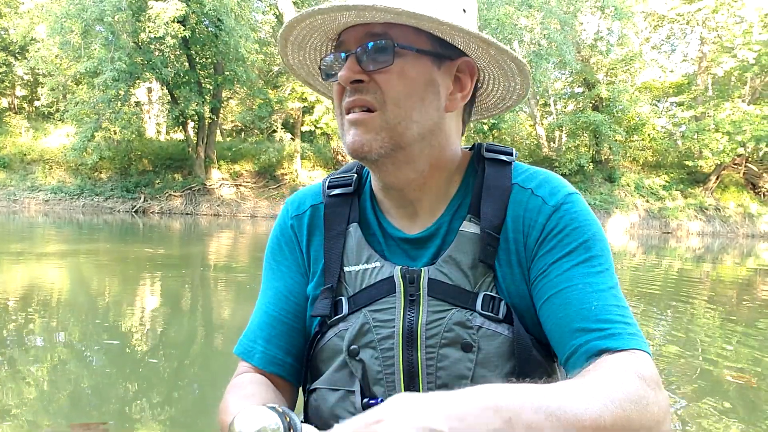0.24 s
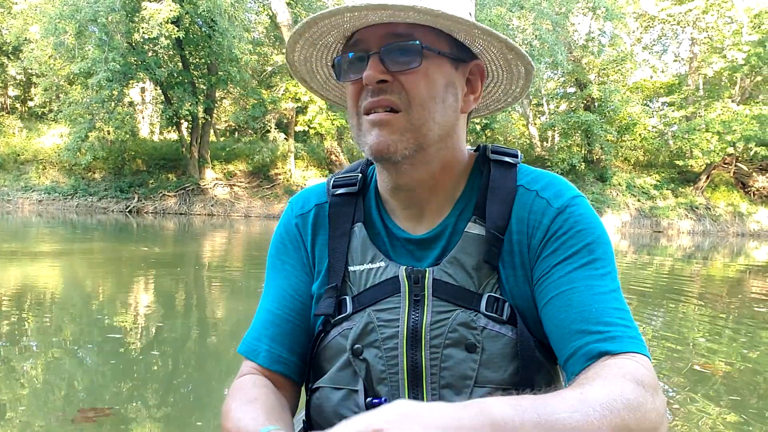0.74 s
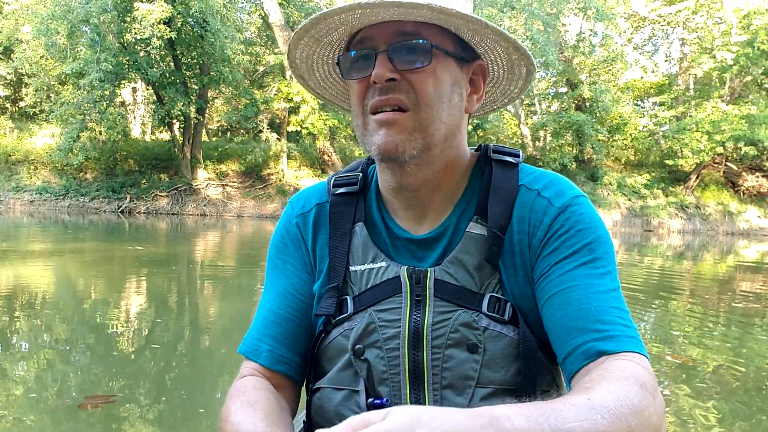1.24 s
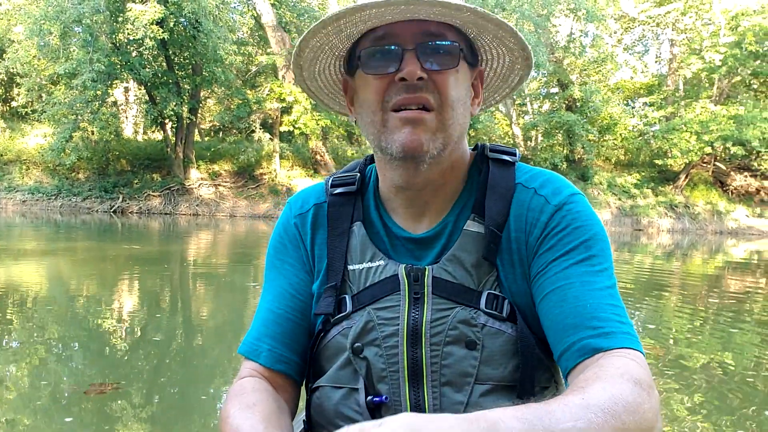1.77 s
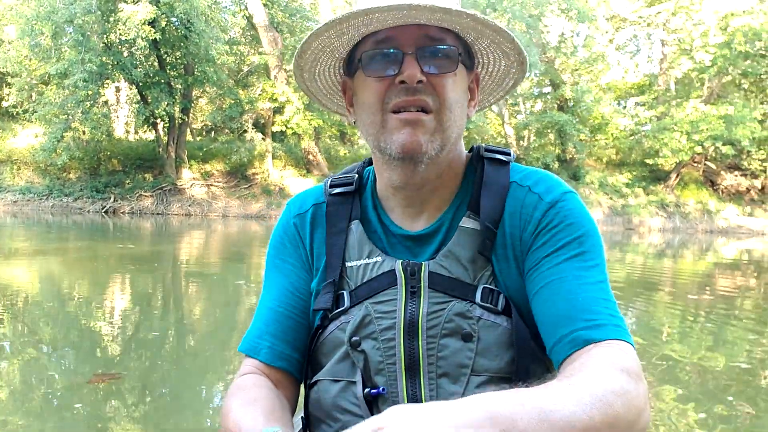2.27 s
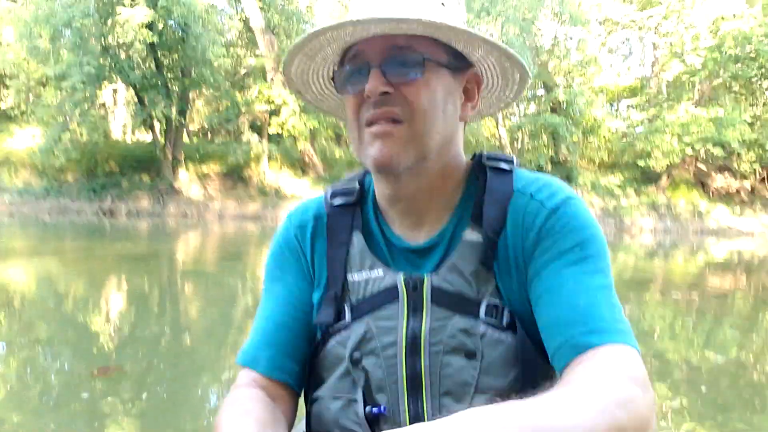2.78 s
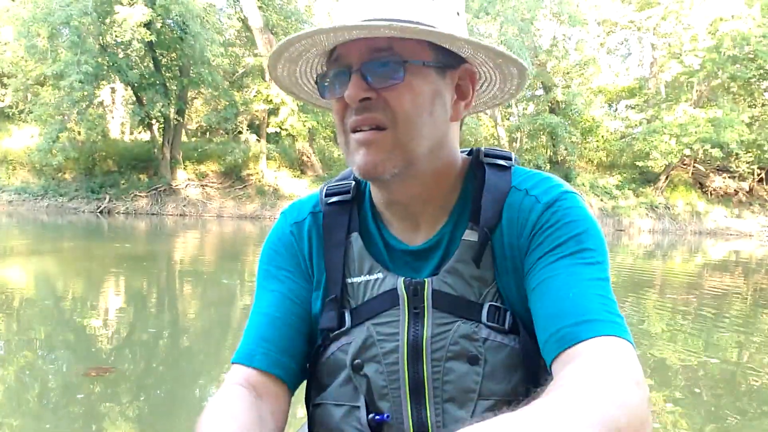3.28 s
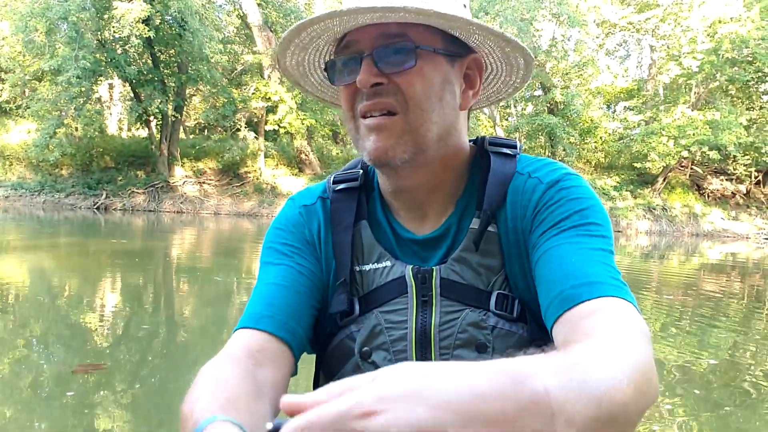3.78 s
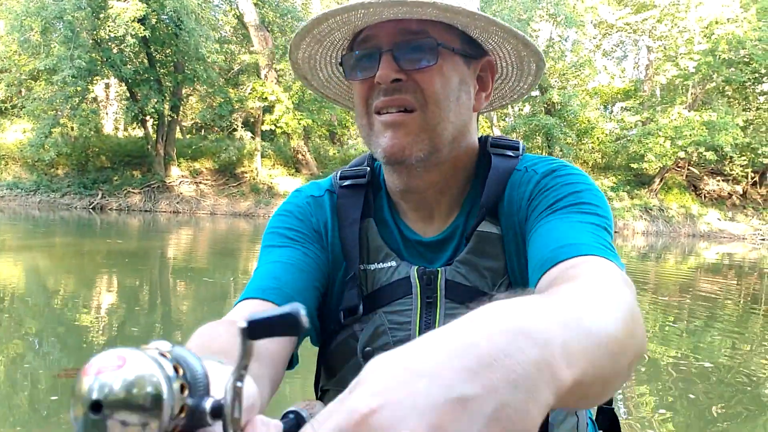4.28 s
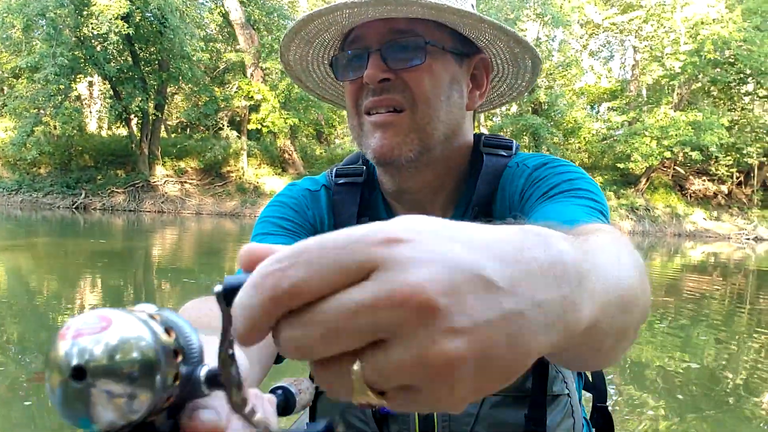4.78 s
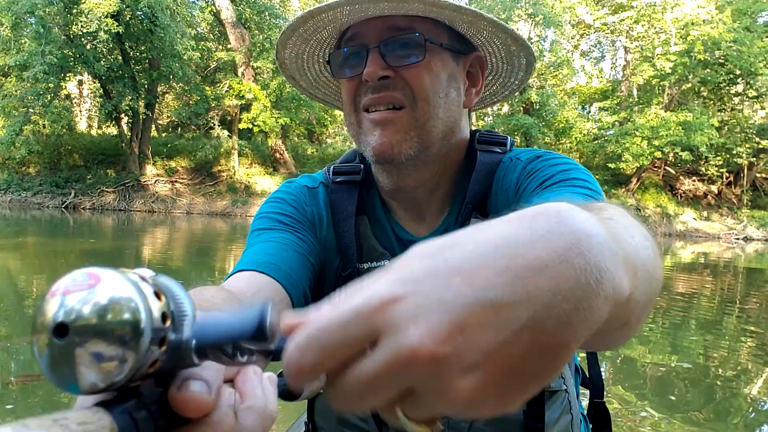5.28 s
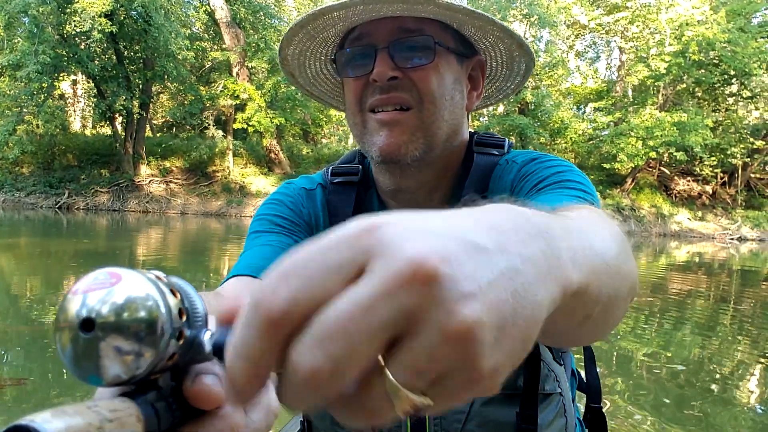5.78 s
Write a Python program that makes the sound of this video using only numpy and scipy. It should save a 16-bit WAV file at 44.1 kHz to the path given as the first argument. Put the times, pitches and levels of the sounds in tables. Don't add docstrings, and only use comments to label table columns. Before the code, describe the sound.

Outdoor insect buzzing and sharp ticking, broken midway by a hollow hull thump with clattering knocks and gritty scraping that dwindle back into insects.

```python
import sys
import numpy as np
from scipy import signal
from scipy.fft import rfft, irfft, next_fast_len
from scipy.io import wavfile
from scipy.ndimage import uniform_filter1d, map_coordinates

SR = 44100
rng = np.random.default_rng(int(sys.argv[2]) if len(sys.argv) > 2 else 0)


def digitize_waveform(pressure):
    field = np.atleast_2d(pressure).T
    bounded = np.clip(field, -1, 1)
    quanta = np.round(bounded * 32767).astype(np.int16)
    wavfile.write(sys.argv[1], SR, quanta)


def attenuation_scalar(level_db):
    decades = np.asarray(level_db, float) / 20
    return 10 ** decades


N = 265923

# [f/Hz, correlation]
OUTDOOR_ALIKE = [(60, 0.91), (130, 0.75), (290, 0.41), (640, -0.012), (1410, -0.22), (3100, -1),
                 (6820, 0.52), (15000, 0.07)]
# [f/Hz, correlation]
HULL_ALIKE = [(60, 0.61), (130, 0.86), (290, 0.53), (640, 0.21), (1410, -0.00088), (3100, -0.061),
              (6820, -0.087), (15000, 0.11)]
# [f/Hz, level/dB]
GRIT_COLOUR = [(900, -12.5), (1470, -3), (2600, -5.5), (6000, -12), (10000, -13.5), (16000, -14)]
# [stop t/s, level/dB, left-right level/dB, swell/dB per s]
BUZZES = [
    (1.74, -30.5, -7, 3.5),
    (4.518, -34, -7, 2.5),
    (6.2, -30.5, -1.5, 5),
]


def unit(x):
    return x / np.sqrt(np.mean(x ** 2) + 1e-20)


def along(points, hz):
    f, v = np.transpose(points)
    return np.interp(np.log(hz + 1), np.log(f + 1), v)


def curves(rows, outside=None):
    s, *columns = np.transpose(rows)
    now = np.arange(N) / SR
    return np.array([np.interp(now, s, column, outside, outside) for column in columns])


def wobble(rate):
    knots = rng.standard_normal(int(N * rate / SR) + 4)
    return map_coordinates(knots, [np.arange(N) * rate / SR])


def filtered(x, response):
    m = next_fast_len(N + SR // 5)
    spectrum = rfft(x, m) * response(np.fft.rfftfreq(m, 1 / SR))
    return irfft(spectrum, m)[..., :N]


def colour(points):
    return lambda hz: attenuation_scalar(along(points, hz))


def resonances(modes):
    def response(f):
        total = 0
        for k, (centre, width, db) in enumerate(modes):
            damping = 1j * f * width
            total = total + (-1) ** k * attenuation_scalar(db) * damping / (centre * centre - f * f + damping)
        return total
    return response


def pair(response, alike, spiky_db=0):
    grain = attenuation_scalar(spiky_db * np.array([wobble(300), wobble(330)]))
    noise = rng.standard_normal((2, N)) * grain

    def mid_side(hz):
        turn = np.arccos(np.clip(along(alike, hz), -1, 1)) / 2
        return response(hz) * np.array([np.cos(turn), np.sin(turn)])

    mid, side = filtered(noise, mid_side)
    return unit(np.array([mid + side, mid - side]))


def pan(db):
    return attenuation_scalar([[db / 2], [-db / 2]])


def ring(db, hz, t60, attack):
    t = np.arange(SR // 5) / SR
    envelope = attenuation_scalar(db - 60 * t / t60) * (1 - np.exp(-t / attack))
    return envelope * np.sin(2 * np.pi * hz * t)


def add(track, s, sound):
    start = round(s * SR)
    track[:, start:start + sound.shape[-1]] += sound


def swells(times, peaks_db, rise_db_s, fall_db_s):
    late = np.arange(N) / SR - np.reshape(times, (-1, 1))
    slope_db = np.where(late < 0, rise_db_s * late, -fall_db_s * late)
    return attenuation_scalar(np.max(np.reshape(peaks_db, (-1, 1)) + slope_db, axis=0))


def teeth(gate, wing, rate, direct=0):
    port_lag = 14
    struck = rng.random((2, N)) < rate / SR
    strikes = struck * rng.normal(0, 1, (2, N)) * np.sqrt(SR / rate)
    right = direct * np.roll(strikes[0], port_lag) + np.sqrt(1 - direct ** 2) * strikes[1]
    heard = np.array([strikes[0], right])
    power = np.mean(colour(wing)(np.fft.rfftfreq(SR, 1 / SR)) ** 2)
    return filtered(gate * heard, colour(wing)) / np.sqrt(power)


def air():
    # [f/Hz, level/dB]
    air_colour = [(20, -26), (32, -14), (84, 1), (118, -4.5), (136, -16), (215, -9.5), (260, -14),
                  (500, -23), (1180, -29.5), (2500, -43.5), (4500, -62), (5500, -25), (6000, -51.5),
                  (7500, -120)]
    # [t/s, level/dB]
    air_level = [(0.0, -56.5), (6.03, -53)]
    return attenuation_scalar(curves(air_level) + 2.2 * wobble(4.1)) * pair(colour(air_colour), OUTDOOR_ALIKE)


def wake():
    # [t/s, level/dB]
    wake_level = [
        (0, -70),
        (.9, -76),
        (2.4, -65),
        (4.5, -82.5),
        (5.3, -70.5),
        (6.03, -67.5),
    ]
    # [f/Hz, level/dB]
    lapping = [(150, -25.5), (300, -1), (600, 0), (1000, -11), (2000, -54.5)]
    return attenuation_scalar(curves(wake_level) + 2.2 * wobble(9.3)) * pair(colour(lapping), OUTDOOR_ALIKE)


def crickets():
    # [t/s, level/dB]
    cricket_level = [(0.0, -45), (2.8, -45), (3.2, -46.5), (4.7, -46), (6.03, -44)]
    # [f/Hz, level/dB]
    chirr = [(3530, -37), (6000, -37), (6640, -11.5), (7380, 0), (7900, 0), (8210, -7), (8500, -14.5),
             (8800, -28.5), (11400, -58.5), (19400, -120)]
    gate = attenuation_scalar(curves(cricket_level) + 5 + 0.65 * wobble(20)) * pan(0.99)
    return teeth(gate, chirr, rate=6000, direct=0.073)


def far_katydids():
    # [t/s, level/dB]
    far_level = [(0, -29), (.47, -33), (.8, -30.5), (1.3, -28.5), (1.7, -30), (1.85, -32.5), (2.5, -34),
                 (2.7, -29), (3.1, -33), (3.6, -31), (4.5, -34.5), (4.6, -35.5), (5.0, -34), (5.6, -29.5),
                 (6.03, -32)]
    # [f/Hz, level/dB]
    far_wing = [(6000, -120), (7500, -21.5), (8800, -10.5), (9800, -9.5), (11000, -0.5), (13000, 5.5),
                (14200, 5.5), (15200, 5.5), (15800, 0.5)]
    flutter_db = np.array([0.76 * wobble(60) + 0.46 * wobble(9.7) for _ in range(2)])
    return teeth(pan(3.5) * attenuation_scalar(curves(far_level) + flutter_db), far_wing, rate=20000, direct=0.14)


def katydid_ticks():
    # [t/s, peak level/dB, left-right level/dB]
    single_ticks = [(0.0034, -21.5, -5), (0.038, -20.5, -1.5), (0.124, -14.5, -0.5), (0.186, -19.5, -9.5),
                    (0.2149, -18.5, 2.5), (0.2625, -16.5, -5), (0.3378, -14, -3.5), (0.414, -17, -3),
                    (0.5155, -19, 6.5), (0.734, -20.5, -3.5), (0.8051, -24, 0), (0.9597, -22, 4.5),
                    (1.0919, -19.5, 3.5), (1.2174, -18, -1.5), (2.376, -23.5, 0.5), (2.5795, -20, -5),
                    (2.8444, -19, -4), (3.074, -22, -4.5), (3.159, -19.5, -3)]
    # [t/s, peak level/dB, left-right level/dB]
    clipped_ticks = [(2.009, -13.5, -1), (2.168, -19, -2.5)]
    # [t/s, peak level/dB, left-right level/dB]
    answers = [(2.176, -26.5, 0), (2.232, -26, 0), (2.307, -25, 4), (2.33, -29.5, 0.5), (2.4014, -24.5, 2),
               (2.482, -25.5, 1.5), (2.673, -22.5, -1), (3.007, -23.5, -6)]
    # [t/s, peak level/dB, left-right level/dB]
    late_ticks = [(4.747, -17, 1), (4.869, -16, 0), (4.9865, -16, -2), (5.075, -16, 0), (5.156, -14.5, 2.5),
                  (5.229, -17.5, 0), (5.404, -23, -10.5), (5.6, -16.5, -7), (5.672, -13, -2),
                  (5.7503, -18, -6), (5.8371, -18, -4)]
    # [f/Hz, level/dB]
    tick_wing = [(6000, -120), (8500, -43), (10200, -11.5), (11300, -1.5), (11900, 2), (13500, 4.5),
                 (15000, 7.5), (15800, 0)]
    # [f/Hz, level/dB]
    late_wing = [(6000, -120), (8500, -43), (10500, -12), (11500, 0), (12500, 5), (14000, 5), (15000, 1),
                 (15800, -3)]
    early, late = np.zeros((2, 2, N + SR))
    t = np.arange(SR // 20) / SR
    songs = [(early, single_ticks, 0.012), (early, clipped_ticks, 0.0027),
             (early, answers, 0.014), (late, late_ticks, 0.012)]
    for track, rows, life in songs:
        build = np.clip(t / (0.16 * life), 0, 1)
        blur = 0.67 * np.exp(-(t - life) / 0.0039)
        closure = build * np.where(t < life, 1, blur)
        for s, db, side_db in rows:
            add(track, s, pan(side_db) * attenuation_scalar(db - 6.0) * closure)
    first = teeth(early[:, :N], tick_wing, rate=16000, direct=0.26)
    return first + teeth(late[:, :N], late_wing, rate=16000, direct=0.3)


def foliage(song):
    # [f/Hz, width/Hz, level/dB over the common wing]
    wing_cores = [
        [(11600, 500, 1), (12200, 410, -4), (13700, 1100, 4)],
        [(12500, 400, 1), (13900, 600, 2), (15400, 300, 4.5)],
        [(11460, 700, 8), (12700, 500, 4), (14800, 1200, -5)],
    ]
    hz, t, z = signal.stft(song, SR, nperseg=1024)
    field = uniform_filter1d(rng.standard_normal(z.shape), size=4, axis=1)
    field = uniform_filter1d(field, size=24, axis=2)
    gain_db = 4 * unit(field)
    start = 0
    for stop, core in zip(np.transpose(BUZZES)[0], wing_cores):
        shape_db = sum(db / (1 + (2 * (hz - centre) / width) ** 2) for centre, width, db in core)
        singing = (t > start) & (t <= stop + 0.1)
        gain_db = gain_db + np.outer(shape_db, singing)
        start = stop + 0.1
    return signal.istft(z * attenuation_scalar(gain_db - 1.5), SR, nperseg=1024)[1][:, :N]


def katydid_buzzes():
    # [t/s of one stroke at full voice, f/Hz of strokes]
    strokes = [(.56, 44.7), (3.35, 44.5), (5.393, 42.5)]
    # [f/Hz, level/dB]
    buzz_wing = [(6000, -120), (8000, -45), (9700, -21.5), (11000, -7), (12300, 0.5), (13000, 0.5),
                 (14200, 5.5), (15200, 0.5), (15800, -3.5)]
    fade_in_db_s = 89.5
    gate = np.zeros((2, N))
    now = np.arange(N) / SR
    for (stop, db, side_db, swell_db_s), (s, rate) in zip(BUZZES, strokes):
        stroke = 0.33 + np.abs(np.cos(np.pi * rate * (now - s))) ** 2.1
        effort_db = db + np.where(now < s, fade_in_db_s, swell_db_s) * (now - s)
        gate += (now < stop) * pan(side_db) * attenuation_scalar(effort_db + 1.2 * wobble(25)) * stroke
    return foliage(teeth(gate, buzz_wing, rate=18000, direct=0.49))


def reel():
    # [t/s, level/dB]
    pushes = [(4.58, -64), (4.66, -59.5), (4.88, -69), (4.98, -60), (5.12, -62), (5.2, -61.5), (5.28, -61),
              (5.49, -67), (5.65, -63.5)]
    # [t/s, level/dB]
    rubs = [(4.66, -60), (4.955, -53), (4.974, -49), (4.995, -53), (5.03, -54.5), (5.135, -57.5)]
    # [f/Hz, level/dB]
    skin = [(300, -22), (900, 2), (2000, -9.5), (3200, -9.5), (6000, -3.5), (9000, -29)]
    # [t/s, peak level/dB]
    pawl_clicks = [(.06, -54), (0.299, -58), (.345, -60), (.416, -61), (.515, -62), (1.1, -60),
                   (3.826, -48.5), (4.972, -48), (4.987, -54), (5.024, -56)]
    low, high = [pair(resonances([(hz, 50, 0)]), [(1000, 0.15)], spiky_db=-1.0) for hz in (930, 1010)]
    grip = 0.45 + 0.4 * wobble(5)
    whirr = np.cos(grip) * low + np.sin(grip) * high
    gears = swells(*np.transpose(pushes), rise_db_s=200, fall_db_s=150) * whirr
    rustle = pair(colour(skin), [(1000, 0.09)], spiky_db=4.5)
    fingers = swells(*np.transpose(rubs), rise_db_s=500, fall_db_s=398) * rustle
    clicking = np.zeros((2, N + SR))
    t = np.arange(SR // 10) / SR
    for s, db in pawl_clicks:
        add(clicking, s, attenuation_scalar(db - 60 * t / 0.017))
    return gears + fingers + clicking[:, :N] * pair(colour(GRIT_COLOUR), HULL_ALIKE)


def gear_rattle():
    # [t/s, peak level/dB, length/s, left-right level/dB]
    gear_snaps = [(2.671, -17, 0.011, -2.5), (2.691, -16, 0.0088, -3), (2.721, -11.5, 0.012, 1.5),
                  (2.7405, -14.5, 0.006, 2.5), (2.806, -16.5, 0.008, 4), (2.853, -19, 0.005, 1.5),
                  (2.914, -23.5, 0.008, 17), (2.923, -6.5, 0.013, -5), (2.944, -15.5, 0.0086, 9),
                  (3.033, -27, .006, 5), (3.058, -30, .006, 5), (3.0844, -25, 0.0075, 11),
                  (3.124, -31, .006, 5)]
    # [f/Hz, level/dB]
    snap_colour = [(500, -13.5), (1500, -7), (5000, -8.5), (10000, -9), (16000, 0.5)]
    # [t/s, peak level/dB, f/Hz, t60/s, left-right level/dB]
    shell_taps = [(2.669, -27, 4000, .004, 0), (2.69, -23, 2980, 0.018, 1), (2.7205, -20.5, 1290, 0.019, 1),
                  (2.7405, -19, 4300, .005, 2), (2.754, -24.5, 3200, .025, 1), (2.806, -23, 3600, .007, 3),
                  (2.838, -24, 1604, .03, 3), (2.853, -19, 4500, .003, 1), (2.944, -22, 5000, .006, 3),
                  (2.9035, -25, 4760, .015, 4), (2.907, -17, 1610, .02, 2), (2.924, -20, 4700, 0.011, 0),
                  (2.9415, -29, 3320, .01, 3), (2.9875, -24, 4720, 0.014, 3), (2.993, -23, 3000, .012, 3),
                  (3.033, -29, 1620, 0.023, 2), (3.066, -30, 1640, .04, 6), (3.113, -30, 1640, 0.036, 5),
                  (3.169, -37.5, 1290, .03, 4), (3.185, -33.5, 800, 0.032, 1), (3.198, -35, 820, .03, 4),
                  (3.337, -23.5, 300, 0.063, 5), (3.4176, -39.5, 1450, .03, 3), (3.4455, -31, 1170, .07, 2),
                  (3.446, -34, 1950, 0.065, 3), (3.453, -33, 1450, .03, 2), (3.502, -39, 2340, .04, -2),
                  (3.503, -39.5, 3190, 0.027, -4), (3.68, -49, 900, .12, 2), (3.705, -49, 960, .1, 2),
                  (3.83, -50, 620, .1, 0), (4.006, -58, 930, .08, 2), (4.046, -55, 980, .08, 3),
                  (4.052, -54, 660, .06, 3), (4.072, -58, 990, .1, 3), (4.175, -59, 1000, .08, 2),
                  (4.262, -57, 950, .1, 3), (4.266, -58, 640, .06, 3), (4.97, -56, 1500, .03, 0),
                  (5.32, -61, 390, .15, 0), (5.021, -59, 3400, .05, 0)]
    snapping, tapping = np.zeros((2, 2, N + SR))
    t = np.arange(SR // 10) / SR
    for s, db, life, side_db in gear_snaps:
        add(snapping, s, pan(side_db) * attenuation_scalar(db + 2.5 - 60 * t / life))
    for s, db, hz, t60, side_db in shell_taps:
        add(tapping, s, pan(side_db) * ring(db + 1.5, hz, t60, attack=0.0004))
    return snapping[:, :N] * pair(colour(snap_colour), HULL_ALIKE) + tapping[:, :N]


def damped_bumps():
    # [t/s, level/dB, f/Hz, t60/s]
    bumps = [(0.07, -49, 175, 0.29), (0.292, -51, 195, 0.26), (2.8485, -7, 310, 0.024),
             (2.837, -13, 660, 0.039), (2.843, -27.5, 890, .04), (2.898, -21, 760, .04),
             (2.9135, -19.5, 770, 0.042), (2.924, -17, 1400, .015), (2.806, -24, 920, .04),
             (3.4, -34, 370, 0.25), (3.495, -32.5, 466, 0.14), (3.44, -31, 215, 0.24),
             (3.7, -32, 197, 0.12), (3.728, -28, 112, .2), (3.865, -36, 190, .15), (3.48, -35, 338, 0.43),
             (4.664, -51, 239, .1), (3.1185, -9, 298, 0.04), (3.47, -22, 71, 0.44), (4.079, -33, 89, 0.28),
             (4.14, -34, 87, .2), (3.915, -37, 78, 0.16), (3.4, -29, 88, .2), (4.33, -40, 80.5, 0.74),
             (2.752, -7, 393, 0.042), (2.8255, -9.5, 513, 0.04), (2.8255, -13.5, 950, 0.05),
             (2.907, -20, 794, 0.05), (2.852, -14, 500, 0.096), (3.4, -24, 310, 0.041),
             (3.226, -11, 311, 0.04), (3.325, -24, 302, 0.091), (3.446, -31, 1550, 0.048),
             (3.52, -33, 239, 0.13), (3.659, -30.5, 169, 0.2), (3.841, -31.5, 193, 0.24),
             (4.07, -34, 182, 0.24), (4.29, -39, 180, 0.22), (4.45, -44.5, 186, 0.21),
             (4.641, -36, 79, 0.26)]
    track = np.zeros((2, N + SR))
    for s, db, hz, t60 in bumps:
        add(track, s, pan(1.0) * ring(db, hz, t60, attack=t60 / 30))
    return track[:, :N]


def knocks():
    # [t/s, crack peak level/dB, thud level/dB above it, ring f/Hz, left-right level/dB]
    blows = [(2.66, -33, 10, 703, 3), (2.688, -18, -9, 815, 1), (2.712, -24, -2, 870, -1),
             (2.749, -13, -6, 1430, 1.5), (2.825, -17.5, -6, 930, 6.5), (2.838, -20.5, 5, 1060, -0.5),
             (2.851, -31, 9, 958, 12), (2.906, -15, -6, 780, 11), (2.965, -28.5, -13, 760, 3),
             (2.988, -12.5, 2, 1740, 3.5), (3.031, -28, -9, 1020, 9), (3.053, -29.5, -1, 755, 5.5),
             (3.17, -37, 9, 890, 0.5), (3.224, -35, 16, 804, 12), (3.113, -25.5, 0, 780, 12),
             (3.325, -44.5, 25.5, 810, 3), (3.375, -55.5, 26, 710, 7), (3.445, -25.5, -8, 1180, 10),
             (3.502, -34.5, -12, 827, -5), (3.825, -46, -11, 801, 0), (4.049, -55, -10, 900, 5),
             (4.264, -53, -2, 1045, 4.5)]
    # [f/Hz, level/dB]
    crack_colour = [(300, -34), (600, -0.5), (950, -4.5), (1470, 1.5), (2300, -8), (3500, -25),
                    (8000, -120)]
    cracks, edges, tones = np.zeros((3, 2, N + SR))
    t = np.arange(SR // 10) / SR
    for s, db, thud_db, ring_hz, side_db in blows:
        side = pan(side_db)
        add(cracks, s, side * attenuation_scalar(db - 6.5 - 60 * t / 0.061) * (1 - np.exp(-t / 0.00058)))
        add(edges, s, side * attenuation_scalar(1.28 * db - 7 - 60 * t / 0.051))
        add(tones, s, side * ring(db - 5.0, ring_hz, t60=0.025, attack=0.0006))
        add(tones, s, ring(db + thud_db + 4.0, 219.8, t60=0.053, attack=0.0019))
    body = cracks[:, :N] * pair(colour(crack_colour), HULL_ALIKE)
    edge = edges[:, :N] * pair(colour(GRIT_COLOUR), HULL_ALIKE)
    return body + edge + tones[:, :N]


def hull_booms():
    # [t/s, level/dB, f/Hz, t60/s]
    bending_blows = [(2.655, -12.5, 110, .1), (2.664, -7.5, 77.8, 0.82), (2.709, -5.5, 59.6, 0.22),
                     (2.753, -13.5, 115, 0.27), (2.79, -7.5, 75, .1), (2.831, -21.5, 66, 0.35),
                     (2.8756, -9, 81.5, 0.094), (2.906, -13, 100, 0.066), (2.924, -12.5, 78, .2),
                     (2.975, -22, 79, .2), (3.04, -17.5, 65, 0.315), (3.068, -15, 78, 0.14),
                     (3.135, -22.5, 80, .2), (3.181, -25, 62.6, .3), (3.256, -25, 62, 0.38)]
    choke_s, lag_s = 0.0025, 0.00086
    track = np.zeros((2, N + SR))
    next_times = [*np.transpose(bending_blows)[0][1:], N / SR]
    for (s, db, hz, t60), after in zip(bending_blows, next_times):
        boom = ring(db, hz, t60, attack=0.0008)
        overlap = np.clip(np.arange(len(boom)) / SR - after + s, 0, None)
        boom = boom[None] * np.exp(-overlap / choke_s)
        add(track[:1], s - lag_s / 2, boom)
        add(track[1:], s + lag_s / 2, boom)
    return track[:, :N]


def grind():
    # [t/s, boom level/dB]
    press = [(2.65, -22.5), (2.71, -20), (3.07, -26.5), (3.25, -37.5), (3.5, -34.5), (3.93, -47),
             (3.99, -60), (4.12, -54), (4.75, -61.5)]
    # [t/s, wall shudder level/dB, scrape level/dB, grit level/dB above the mud]
    lurches = [(2.69, -20, -27, -16), (2.728, -21, -30, 8), (2.76, -25, -36, 7.5), (2.835, -17, -26, -3),
               (2.912, -15, -27.5, 0.5), (2.991, -16, -42, 13.5), (3.069, -29, -43, 7),
               (3.12, -29, -46, -5), (3.182, -33, -40.5, -13), (3.233, -28.5, -54, 2.5),
               (3.33, -32.5, -52, -34), (3.4, -37, -46.5, -30), (3.455, -33, -36.5, -4),
               (3.51, -34.5, -40, -1), (3.57, -45, -49, -18), (3.63, -40, -58, -7), (3.69, -44, -53, -17),
               (3.74, -46, -62, -12), (3.84, -46.5, -59, 0), (4.055, -54, -53, -7), (4.18, -76, -64, 2),
               (4.27, -68, -59, -2)]
    # [t/s, f/Hz]
    bend_pitch = [(2.65, 87.7), (2.73, 60.75), (2.81, 79.1), (2.87, 79.3), (2.98, 64), (3.07, 76.7),
                  (3.2, 69.2), (3.8, 84), (4.2, 97.3)]
    # [f/Hz, width/Hz, level/dB]
    boom_modes = [(64, 25, -4), (83, 25, 0), (115, 54, -4)]
    # [f/Hz, width/Hz, level/dB]
    wall_modes = [(187.3, 39, 4.5), (308, 53, 1.5), (391, 88, -4.5), (482, 68, -6), (592, 77, -11)]
    # [f/Hz, level/dB]
    drag_colour = [(250, -27), (420, -4), (600, 1.5), (950, 1.5), (1400, -15), (2200, -28.5)]
    boom_db, = curves(press, outside=-120)
    grip_db = 1.03 * (boom_db - boom_db.max()) + boom_db.max()
    s, wall_db, scrape_db, stony_db = np.transpose(lurches)

    def lurch(db):
        return swells(s, db, rise_db_s=449, fall_db_s=347.5)

    turns = np.cumsum(curves(bend_pitch)[0] * (1 + 0.067 * wobble(30))) / SR
    bend = np.sqrt(2) * np.sin(2 * np.pi * turns) * attenuation_scalar(7.2 * wobble(23.02))
    rumble = pair(lambda hz: resonances(boom_modes)(hz) / (1 + (hz / 250) ** 2), HULL_ALIKE)
    boom = 0.41 * bend + 1.13 * rumble
    walls = pair(lambda hz: resonances(wall_modes)(hz) / (1 + (hz / 800) ** 4), HULL_ALIKE, spiky_db=3.5)
    drag = pair(colour(drag_colour), HULL_ALIKE, spiky_db=3.0)
    grit = pair(colour(GRIT_COLOUR), HULL_ALIKE, spiky_db=3.5)

    shudder_gain = attenuation_scalar(boom_db - 9) + lurch(wall_db - 3.0)
    drag_gain = attenuation_scalar(grip_db - 20.5) + lurch(scrape_db)
    grit_gain = attenuation_scalar(grip_db - 28) + lurch(scrape_db + stony_db - 2.0)
    touching = np.clip((np.arange(N) / SR - 2.6535) / 0.0068, 0, 1)
    rubbing = attenuation_scalar(boom_db) * boom + shudder_gain * walls * pan(1.24)
    return touching * (rubbing + drag_gain * drag + grit_gain * grit)


def scene():
    background = air() + wake() + crickets() + far_katydids()
    near = katydid_ticks() + katydid_buzzes() + reel()
    canoe = gear_rattle() + damped_bumps() + knocks() + hull_booms() + grind()
    return background + near + canoe


def band_limit(x):
    return signal.sosfilt(signal.butter(12, 16850, fs=SR, output="sos"), x)


def record(dry):
    low_cut_hz, top_hz = 27, 15765
    mix = filtered(dry, lambda hz: (hz < top_hz) * (1j * hz / (low_cut_hz + 1j * hz)))
    return band_limit(mix)


dry = scene()
out = record(dry)
digitize_waveform(out)
```